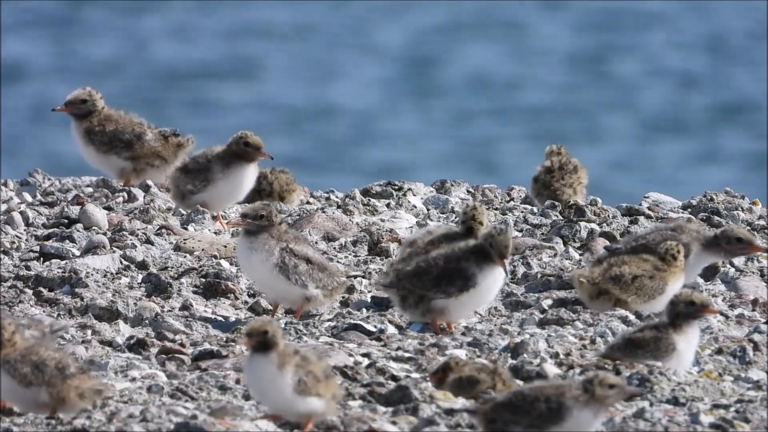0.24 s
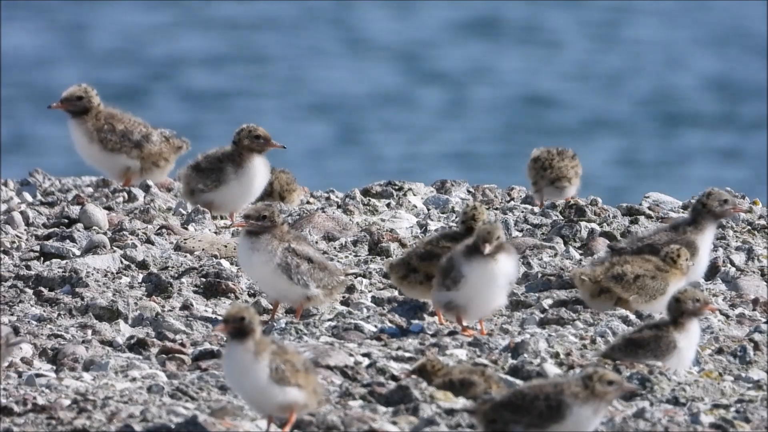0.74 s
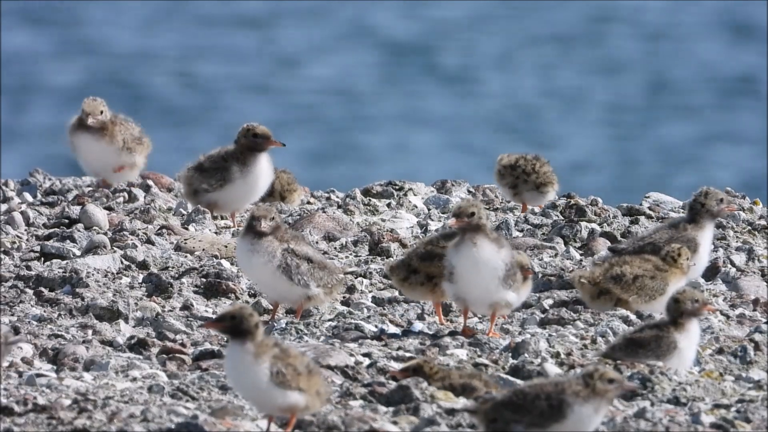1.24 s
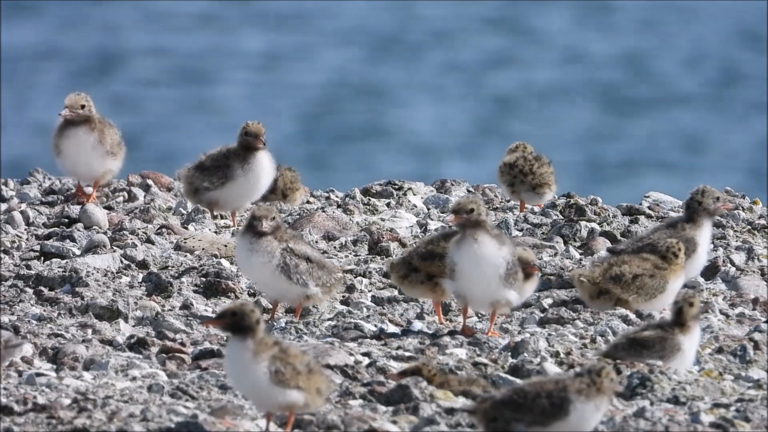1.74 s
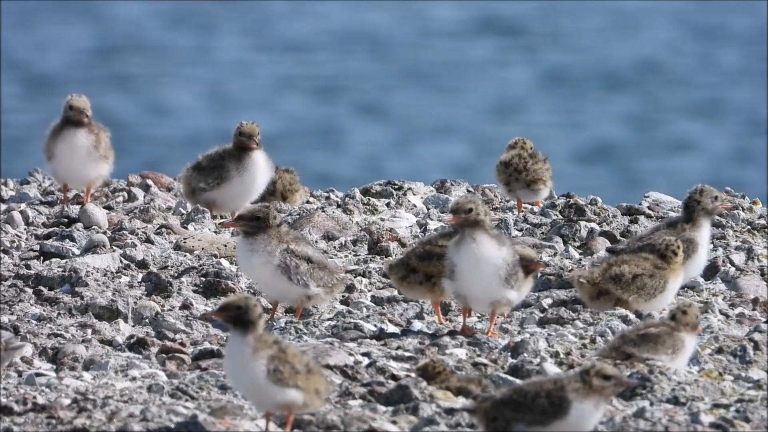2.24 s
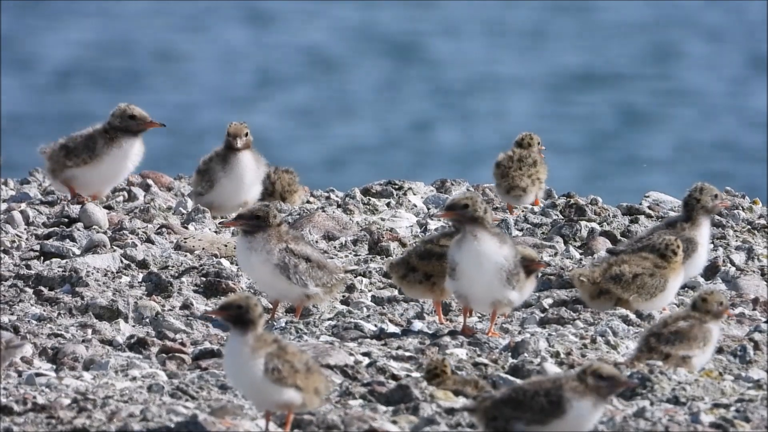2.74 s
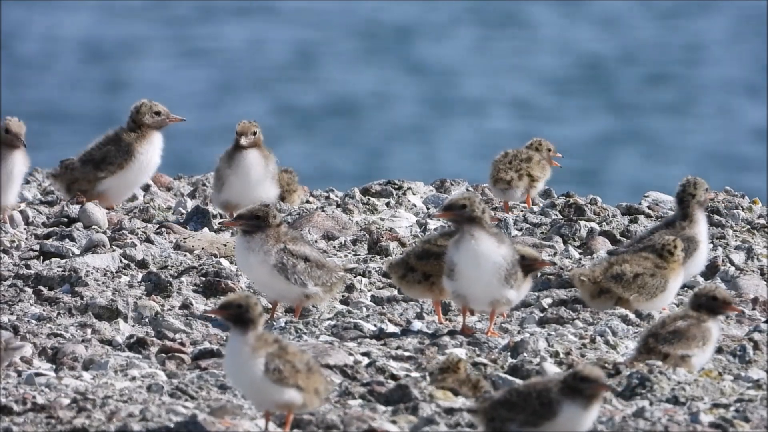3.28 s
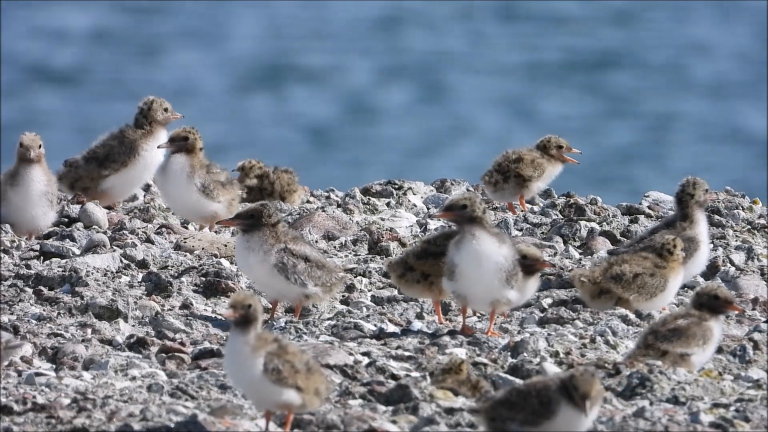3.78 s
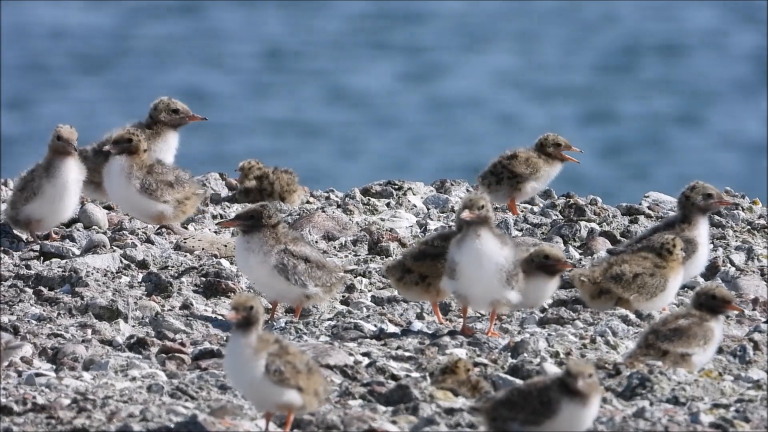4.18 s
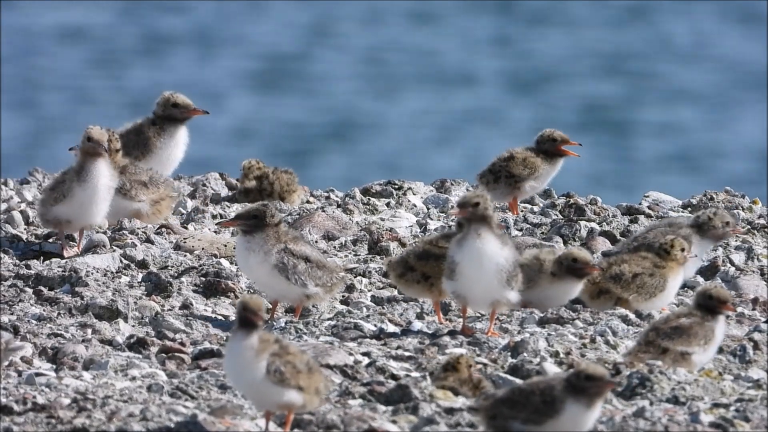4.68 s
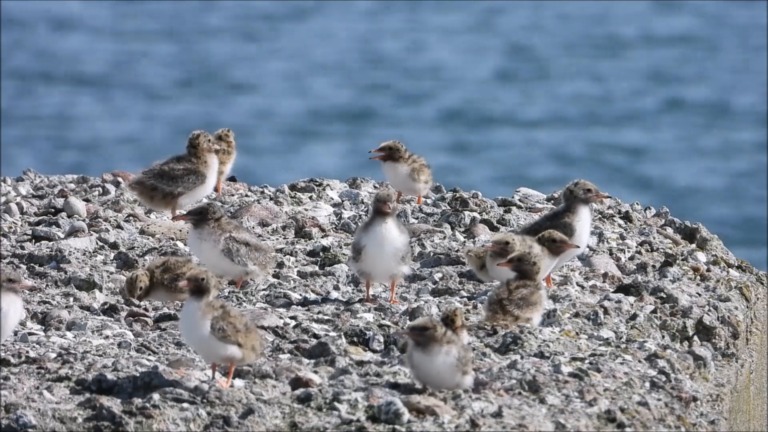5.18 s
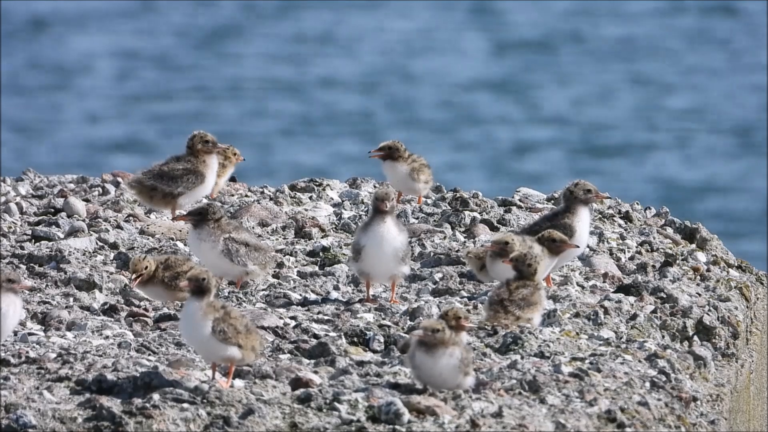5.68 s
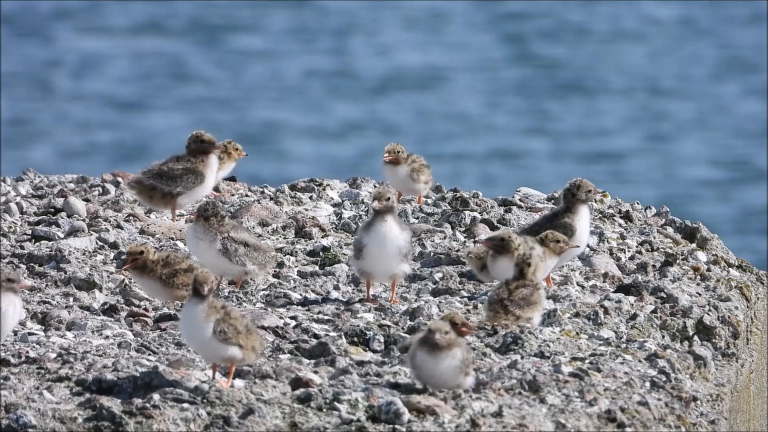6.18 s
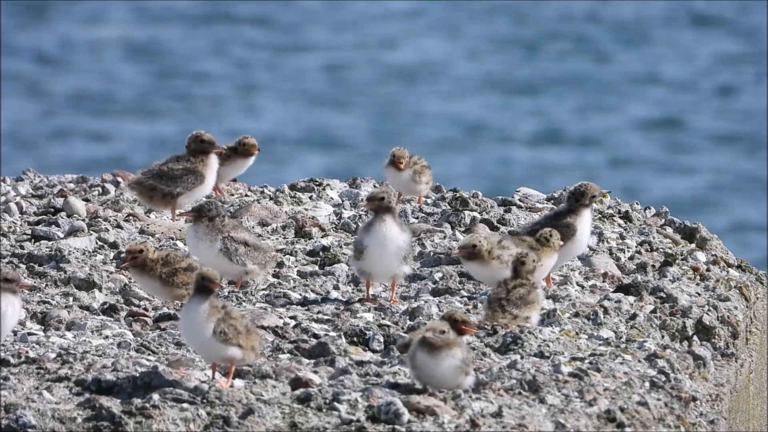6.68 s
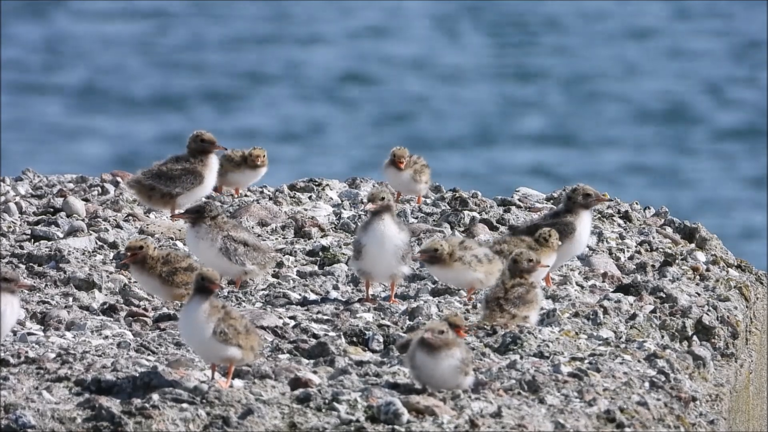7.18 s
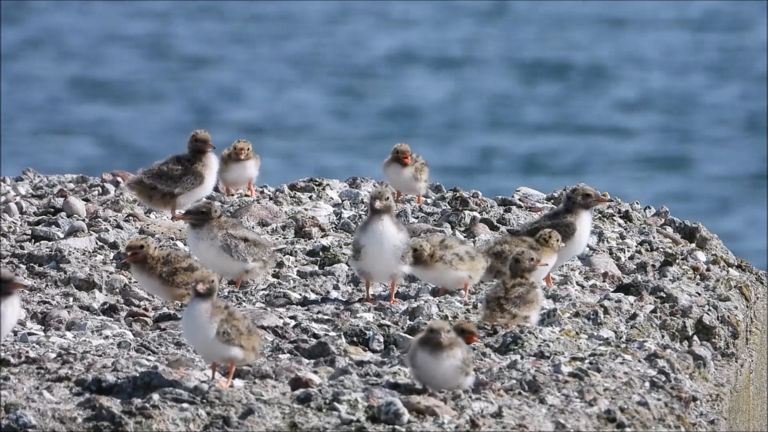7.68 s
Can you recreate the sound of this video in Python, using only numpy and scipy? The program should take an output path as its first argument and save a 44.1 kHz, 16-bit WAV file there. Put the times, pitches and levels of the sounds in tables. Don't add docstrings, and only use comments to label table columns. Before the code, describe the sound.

A seabird colony on a gravel islet, heard close in stereo with thin bass. From 0 to 1.2 seconds the calling is dense and loud: hoarse pulsing rasps, a two-part kee-arr, sharp arched kips, brief trills and husky held notes. From 1.2 to 2.5 more kee-arrs, kips and dry clicking rattles overlap, with a faint rasp near 1.7. It thins from 2.5 to 4, with kips around 3, a faint creaky cry at 3.25 and small far peeps and whistles. At about 4.1 a strained, throbbing scream sags and cracks into creaks until 4.75. Sparse peeps follow, then a soft fast trill at 5.7. A lower scream runs from 5.9 to 6.55. From 6.6 to 7.9 several kee-arrs and kips return, including a loud kip at 7.2. Distant colony chatter swells and fades over faint, steady sea wash.

```python
import sys
import numpy as np
from scipy import signal
from scipy.fft import rfft, irfft, next_fast_len
from scipy.io import wavfile
from scipy.ndimage import uniform_filter1d

SR = 44100
rng = np.random.default_rng(int(sys.argv[2]) if len(sys.argv) > 2 else 0)


def attenuation_scalar(level_db):
    decades = np.asarray(level_db, float) / 20
    return 10 ** decades


def log_audio(samples):
    frames = np.atleast_2d(samples).T
    limited = np.clip(frames, -1, 1)
    pcm = np.round(limited * 32767).astype(np.int16)
    wavfile.write(sys.argv[1], SR, pcm)


N = 349713


def evened(x):
    return x / np.sqrt(np.mean(x ** 2) + 1e-20)


def read(points, hz):
    f, value = np.transpose(points)
    return np.interp(np.log(hz + 1), np.log(f + 1), value)


def add(mix, s, sound):
    part = mix[round(s * SR):][:len(sound)]
    part += sound[:len(part)]


def seconds(length, start=0):
    return np.arange(start, length, 1 / SR)


def share(length):
    return np.arange(0, 1, 1 / (length * SR))


def drift(count, smooth_s):
    size = max(round(smooth_s * SR), 1)
    smooth = uniform_filter1d(uniform_filter1d(rng.standard_normal(count), size), size)
    return smooth * np.sqrt(1.5 * size)


def sine(hz):
    return np.sin(2 * np.pi * np.cumsum(hz) / SR)


def wash(spectrum, same, patchy_db):
    frames, hz = N // 128 + 5, np.fft.rfftfreq(512, 1 / SR)
    a, b, c, d, patches = rng.standard_normal((frames, 257, 5)).T
    patches = evened(uniform_filter1d(uniform_filter1d(patches, 30, 0), 12, 1))
    same = np.clip(read(same, hz), -1, 1)[:, None]
    left = a + 1j * b
    right = same * left + np.sqrt(1 - same ** 2) * (c + 1j * d)
    z = np.array([left, right]) * attenuation_scalar(read(spectrum, hz)[:, None] + patchy_db * patches)
    return evened(signal.istft(z, nperseg=512, noverlap=384)[1][:, :N])


# frequency in Hz, level in dB per Hz.
SEA = [(59, -102), (100, -70.5), (589, -14), (712, -6), (758, -9), (1060, -1.5), (1290, -4.5), (1920, -3),
       (2220, -18.5), (15500, -43.5)]
# frequency in Hz, likeness from -1 to 1.
SEA_SAME = [(60, -0.49), (240, 0.4), (950, 0.9), (3770, 0.26), (15000, -0.04)]


def sea():
    return attenuation_scalar(-58.5) * wash(SEA, SEA_SAME, patchy_db=1.5)


# frequency in Hz, level in dB.
CROWD = [(1500, -32), (2300, 1.5), (2900, 2.5), (4200, -1), (5500, -5), (6800, -25.5), (10000, -42.5)]
# time in seconds, level in dB.
CROWD_DB = [(0.0, -39), (.5, -46), (1.5, -43), (2.5, -61), (3.5, -48), (4.04, -60.5), (4.3, -37.5),
            (4.9, -55.5), (5.2, -64.5), (5.3, -56.5), (5.48, -63), (5.7, -55), (6.16, -40), (6.96, -57.5),
            (7.45, -56), (7.93, -45.5)]


def colony():
    level_db = np.interp(np.arange(N) / SR, *np.transpose(CROWD_DB))
    return attenuation_scalar(level_db) * wash(CROWD, [(100, 0.24), (9000, 0.16)], patchy_db=5.5)


def pulses(hz, start=0.):
    turns = start + np.cumsum(hz) / SR
    samples_off = (turns - np.round(turns)) * SR / hz
    return np.exp(-samples_off ** 2 / 2) * np.sqrt(SR / hz / np.sqrt(np.pi))


# frequency in Hz, gain in dB.
WIDE = [(500, -53), (1100, -12), (1600, -1), (2300, -4), (3200, -2.5), (4000, 4), (4800, 2.5), (5500, -8),
        (6600, -22), (11000, -30), (15500, -58)]
# frequency in Hz, gain in dB.
NARROW = [(500, -47.5), (1100, -12.5), (1500, -15), (2300, 1.5), (2950, 11), (3600, -6.5), (4500, -5.5),
          (5900, -24), (7000, -25), (15500, -58)]


def throat(drive, mouth, narrow):
    hz = abs(np.fft.fftfreq(1024, 1 / SR))
    db = (1 - narrow) * read(WIDE, hz / mouth) + narrow * read(NARROW, hz / mouth)
    pulse_loss = (2 * np.pi * np.minimum(hz, 16000) / SR) ** 2 / 2
    log_gain = np.log(attenuation_scalar(db)) + pulse_loss
    taps = np.fft.ifft(np.exp(np.conj(signal.hilbert(log_gain)))).real[:400]
    return signal.oaconvolve(drive, taps / np.linalg.norm(taps))


def voice(t, throb, hz, db, opened, creak, wobble, sag, mouth, narrow, creak_hz, ring=0.):
    count = len(t)
    creak = np.clip(creak, 0, 1)
    chaos = creak * (1 - creak)
    into = (throb % 1) / opened
    closing = np.clip((1 - into) / 0.044, 0, 1)
    opening = np.clip(into / 0.029 + (opened - .95) / 0.11, 0, 1)
    swing = wobble * np.sin(2 * np.pi * throb)

    sinking = sag * np.minimum(into, 1) ** 4 * np.clip(1.2 - opened, 0, .4) / 0.38
    tone = pulses(hz * (1 + swing - sinking) * np.exp((0.0041 + 0.21 * chaos) * drift(count, 0.0013)))
    tone *= attenuation_scalar(16.3 * swing + 14.7 * chaos * drift(count, 0.0004))
    clicks = pulses(creak_hz * np.exp((0.036 + 0.6 * chaos) * drift(count, 0.0031)))
    clicks *= attenuation_scalar(2.4 * drift(count, 0.0022))

    edges = signal.windows.tukey(count, 0.006 / (count / SR))
    effort = attenuation_scalar(db) * (closing * opening + 0.067) * edges
    return (throat(effort * np.sqrt(1 - creak) * tone, mouth, np.clip(narrow, 0, 1))
            + throat(effort * creak * clicks, mouth, np.clip(narrow + ring, 0, 1.3)))


# start in seconds, length in seconds, throbs per second,
# beak factor, level in dB.
RASPS = [
    (0, .098, 37.4, 1.273, -26),
    (0.234, .205, 37.6, 1.357, -25.5),
    (0.688, .19, 65, 0.746, -40.5),
    (1.72, 0.21, 53, 1.12, -42.5),
    (3.72, .12, 63, 0.67, -50.5),
]


def rasp(s, length, rate_hz, mouth, db):
    t = seconds(length)
    opened = np.clip(.42 + 0.1 * (db + 40.5), .4, .9) + 0 * t
    return s, voice(t, rate_hz * t, 1074 + 0 * t, db, opened, creak=0.75,
                    wobble=0.0033, sag=0.052, mouth=mouth, narrow=0.8, creak_hz=426)


# start in seconds, break in seconds, top pitch in Hz,
# level in dB, beak factor.
KEES = [
    (0.073, 0.179, 1578, -30, 1.026),
    (1.379, 1.531, 1436, -38.5, 1.016),
    (1.962, 2.126, 1511, -39, 0.97),
    (3.25, 3.326, 1447, -43, 0.93),
    (6.621, 6.794, 1498, -38.5, .92),
    (7.11, 7.259, 1494, -37, 1.01),
    (7.495, 7.559, 1600, -34, 1.087),
    (7.777, 7.844, 1519, -34, 1.06),
]
# end in seconds, level change in dB, open share lost per second,
# creak from 0 to 1.
ARRS = [
    (0.392, -4.5, 2.73, 0.22),
    (1.637, -1.5, 5, .2),
    (2.295, -1, 3.9, 0.8),
    (3.536, -0.5, 3.4, 0.4),
    (6.955, -6, 5.5, 0.6),
    (7.378, -2.5, 8, .28),
    (7.655, -2.5, 8.9, 0.4),
    (7.93, -3.5, 7, 0.2),
]


def keearr(start, crack, hz, db, mouth, end, arr_db, shuts, rough):
    t = seconds(end - start)
    since = t - (crack - start)
    early = np.exp(-t / 0.016)
    low = np.clip(since / 0.014 + .5, 0, 1)
    kee_hz = hz * (1 - .17 * early - 0.23 * t)
    pitch = (1 - low) * kee_hz + low * 1123
    level_db = db - 7 * early + arr_db * low
    opened = np.clip(1.1 - shuts * since, 0.34, 1.4)
    creak = .03 * attenuation_scalar(db + 36.5) + low * rough * np.clip(since / 0.057, .3, 1)
    wobble = 0.033 + 0.22 * np.minimum(t, crack - start)
    return start, voice(t, 72.53 * since, pitch, level_db, opened, creak,
                        wobble, sag=0.05, mouth=mouth, narrow=0.4, creak_hz=375)


# start in seconds, length in
# seconds, top pitch in Hz, level in dB, creaky tail in seconds.
KIPS = [(0.396, 0.033, 1972, -23, 0.021), (.519, 0.04, 1670, -34.5, 0.01),
        (.888, 0.035, 1634, -29, 0.013), (1.02, 0.033, 1830, -31.5, 0.011),
        (1.056, 0.032, 1950, -26.5, 0.028), (1.123, 0.038, 1628, -34, 0.0029),
        (1.344, 0.047, 1708, -34.5, 0.0036), (1.473, 0.042, 1730, -31.5, 0.012),
        (1.646, 0.05, 1680, -34, 0.0061), (1.977, 0.032, 1730, -34.5, .004),
        (2.148, 0.053, 1679, -35.5, 0.021), (2.866, 0.036, 1743, -37.5, 0.013),
        (2.993, 0.049, 1860, -29, 0.0067), (3.151, 0.045, 1914, -29.5, 0.003),
        (3.314, 0.053, 1946, -31.5, 0.0047), (4.213, 0.04, 1905, -26.5, .004),
        (4.597, 0.043, 1780, -31, 0.0025), (6.637, 0.04, 1730, -34.5, 0.018),
        (7.216, 0.046, 1599, -23.5, 0.004), (7.614, 0.04, 1663, -34, 0.01),
        (0.644, 0.036, 1468, -32, 0.0043), (0.726, 0.021, 1460, -30, 0.004),
            (0.747, 0.027, 1592, -30, 0.0082), (1.304, 0.023, 1546, -33.5, 0.0045),
            (2.363, 0.017, 1374, -37.5, 0.0057), (2.373, 0.027, 1240, -39.5, 0.0052),
            (2.401, 0.017, 1540, -38.5, 0.002), (2.702, 0.02, 1385, -48, .004),
            (2.762, 0.019, 1588, -35.5, 0.014), (6.962, 0.038, 1262, -36.5, 0.02),
            (7.381, 0.012, 986, -41.5, 0.0026), (7.546, 0.041, 1250, -36.5, .004),
            (7.811, 0.032, 1363, -30, 0.007)]


def kip(s, length, hz, db, tail):
    u, v = share(length), share(tail)
    pitch = hz * (1 - 0.3095 * (u - .4) ** 2 - 0.15 * u ** 6) * (1 + 0.0023 * drift(len(u), 0.0012))
    swell = np.minimum(u * length / 0.0012, 1) * attenuation_scalar(-9 * (u - .4) ** 2 - 1.6 * u ** 6)
    stall = attenuation_scalar(-3 - 9.0 * v) * pulses(220 + 500 * np.exp(-v * tail / 0.0071))
    mouth = 1.15 + 0.16 * np.log2(hz / 1650) + .006 * (db + 25)
    return s, attenuation_scalar(db) * throat(np.r_[swell * pulses(pitch), stall], mouth, 0.39)


# start in seconds, length in seconds, throbs per second,
# pitch in Hz, level in dB.
TRILLS = [
    (0.576, .033, 59, 1895, -36.5),
    (1.162, 0.22, 63, 1365, -46),
    (5.713, 0.35, 84, 1343, -41),
]


def trill(s, length, rate_hz, hz, db):
    t = seconds(length)
    opened = (0.0053 + .003 * np.exp(-t / 0.062)) * rate_hz
    pitch = hz * (1.02 - 0.28 * t - .06 * np.exp(-t / .008))
    return s, voice(t, rate_hz * t, pitch, db + 2 * t / length, opened, creak=.08,
                    wobble=.011, sag=.15, mouth=.97, narrow=0.66, creak_hz=300)


# start in seconds, length in seconds,
# throbs per second, pitch in Hz, level in dB.
HELD = [
    (0.603, 0.032, 59, 1270, -42.5),
    (0.777, .115, 70, 1675, -33),
    (0.902, 0.118, 40.5, 1490, -31.5),
    (3.54, 0.14, 58, 1380, -53),
]


def held(s, length, rate_hz, hz, db):
    t = seconds(length)
    pitch = hz * (1 - 0.203 * t - 0.055 * np.exp(-t / .012))
    opened = .8 + 0.094 * (length > .1) + 0 * t
    return s, voice(t, rate_hz * t, pitch, db, opened, creak=0.14,
                    wobble=.013, sag=0.0475, mouth=1.055, narrow=0.18, creak_hz=301)


# start in seconds, peak in dB, length in seconds.
RATTLES = [(1.142, -9.5, 0.016), (1.1723, -8, 0.015), (1.242, -10.5, 0.024), (1.294, -10.5, 0.026),
           (1.349, -14.5, 0.045), (1.4282, -9, 0.039), (1.563, -9, 0.028), (1.68, -11.5, 0.031),
           (1.793, -13, 0.021), (1.835, -13.5, 0.011), (1.8998, -9, 0.016), (2.008, -9.5, 0.022),
           (2.118, -10.5, 0.024), (2.23, -14, 0.049), (2.345, -9.5, 0.015), (2.4496, -11, 0.012),
           (2.492, -13, 0.0091), (2.561, -14, 0.014), (2.687, -13.5, 0.016), (2.81, -10, 0.01),
           (2.9445, -10, 0.022), (3.1903, -10.5, 0.024), (3.696, -10, 0.011), (3.843, -9.5, 0.026),
           (4.0417, -9.5, 0.017), (4.239, -10, 0.043), (4.875, -15.5, 0.0099), (5.013, -7.5, 0.012)]


def rattle(s, peak_db, length):
    t = seconds(length)
    hz = (250 + 800 * np.exp(-t / 0.0033)) * np.exp(.1 * drift(len(t), 0.00201))
    fade_db = -5 * np.exp(-t / 0.0081) - 11.8 * (t / length) ** 2
    size = attenuation_scalar(fade_db + 2.0 * drift(len(t), 0.00091))
    return s, attenuation_scalar(peak_db - 21.5) * throat(size * pulses(hz, start=-.1), 1.0, 0.27)


# start in seconds, peak in dB, length in seconds.
PEEPS = [(2.684, -34, 0.034), (3.088, -33.5, 0.03), (3.564, -33.5, 0.037), (4.068, -40, 0.024),
         (4.822, -30, 0.025), (4.988, -28, 0.021), (5.2506, -32, 0.026), (5.529, -31.5, 0.023),
         (6.828, -30, 0.018), (7.015, -30.5, 0.027), (7.4675, -31, 0.021)]


def peep(s, peak_db, length):
    t = seconds(length)
    tone = sine(2850 - 4000 * t + 60 * drift(len(t), 0.0022))
    beat = 1 - 0.6 * np.cos(2 * np.pi * 222 * t)
    return s, attenuation_scalar(peak_db - 6.5) * tone * beat * np.sin(np.pi * t / length) ** 0.17


# start in seconds, length in seconds, start pitch in Hz, held pitch in Hz,
# end pitch in Hz, level in dB.
WHISTLES = [
    (3.745, 0.065, 4000, 7150, 6950, -52),
    (7.67, .055, 3700, 3800, 3500, -52),
    (3.88, 0.05, 2950, 2930, 2800, -50),
    (5.07, 0.055, 1950, 2000, 1950, -58),
    (4.73, .2, 5350, 5320, 5280, -57),
    (5.585, 0.06, 3850, 3800, 3550, -59),
]


def whistle(s, length, start_hz, held_hz, end_hz, db):
    u = share(length)
    hz = held_hz + (start_hz - held_hz) / (1 + (u / 0.17) ** 4) + (end_hz - held_hz) * u ** 3
    flutter = attenuation_scalar(db - 2.5 + 3.5 * drift(len(u), .003))
    return s, flutter * sine(hz) * signal.windows.tukey(len(u), .4)


# first full throb in seconds, length in seconds, top pitch in Hz, level in dB,
# throbs per second.
SCREAMS = [
    (4.105, 0.65, 1626, -31.5, 47),
    (5.939, 0.629, 1520, -30, 44),
]


def scream(s, length, hz, db, rate_hz):
    t = seconds(length, start=-.8 / rate_hz)
    hold = 0.00055 * (1626 - hz)
    clear_s, cracked_s, spent_hz = .08, .41, 1217
    cracked = np.clip((t - hold - clear_s) / (cracked_s - clear_s), 0, 1)
    sagging = np.clip(t / (0.49 + 2 * hold), 0, 1)
    pitch = hz * (1 + 2.5 * np.minimum(t, 0)) - (hz - spent_hz) * sagging
    last_gasp = np.clip(1 + (t - length) / 0.049, 0, 1)
    level_db = db - 3 * np.sqrt(cracked) - 4 * (t < 0) - 16 * last_gasp
    opened = np.interp(t, [clear_s, .34, .47 + 4.4 * hold], [.74, 0.94, 0.61])
    throb = rate_hz * t - 2.5 * t ** 2
    return s + t[0], voice(t, throb, pitch, level_db, opened, .015 + 0.9 * cracked ** 1.6, wobble=0.0073,
                           sag=.04 + .3 * cracked, mouth=1.055, narrow=.7, creak_hz=239, ring=0.27)


def shore(x, t60, gap_s):
    t = np.arange(round(.4 * SR)) / SR
    tail = rng.standard_normal((2, len(t))) * attenuation_scalar(-60 * t / t60) * (t > gap_s)
    return signal.fftconvolve(x[None], tail / np.linalg.norm(tail[0]), axes=1)[:, :N]


# frequency in Hz, gain in dB.
MIC = [(4500, 0), (6100, 1.5), (7300, -3.5), (10000, -1.5), (14000, -4.5)]
# frequency in Hz, lead of the left in radians.
LEAD = [(0, 0), (1980, -1.3), (4130, -0.18), (6460, -0.52), (10200, -1.1), (15200, 0.1)]
# frequency in Hz, left over right in dB.
LOUDER = [(60, 1.3), (240, 0.59), (950, 1.4), (3770, 0.55), (15000, 0.5)]


def microphones(x):
    size = next_fast_len(N)
    hz = np.fft.rfftfreq(size, 1 / SR)
    half = attenuation_scalar(read(LOUDER, hz) / 2) * np.exp(.5j * read(LEAD, hz))
    return irfft(rfft(x, size) * attenuation_scalar(read(MIC, hz)) * np.array([half, 1 / half]), size)[:, :N]


def scene():
    near, far = np.zeros(N), np.zeros(N)
    keearrs = [kee + arr for kee, arr in zip(KEES, ARRS)]
    for mix, call, table in ((near, rasp, RASPS), (near, keearr, keearrs), (near, kip, KIPS),
                             (near, trill, TRILLS), (near, held, HELD), (near, rattle, RATTLES),
                             (far, peep, PEEPS), (far, whistle, WHISTLES), (near, scream, SCREAMS)):
        for row in table:
            add(mix, *call(*row))
    echoes = attenuation_scalar(-14.5) * shore(near, 0.057, 0.01) + attenuation_scalar(-5) * shore(far, 0.22, 0.0074)
    return microphones(near + far) + echoes + colony() + sea()


def roll_off(x):
    return signal.sosfilt(signal.butter(12, 15710, fs=SR, output="sos"), x)


def record(dry):
    cut = signal.sosfilt(signal.butter(3, 300, "high", fs=SR, output="sos"), dry)
    cut = signal.oaconvolve(cut, signal.firwin(255, 15400, fs=SR)[None], "same")
    return roll_off(cut)


dry = scene()
out = record(dry)
log_audio(out)
```